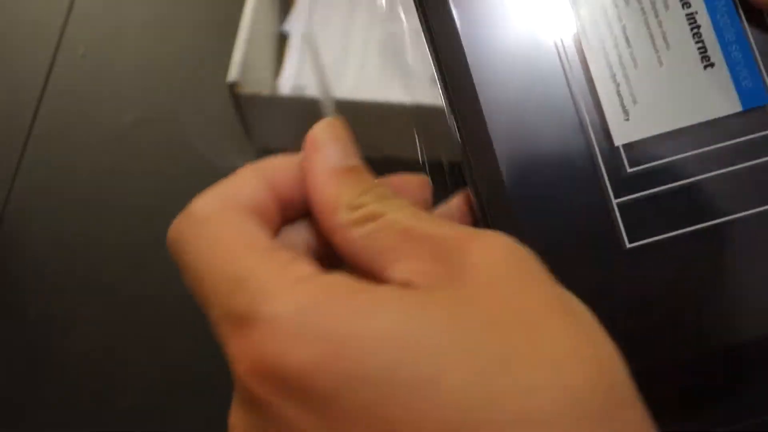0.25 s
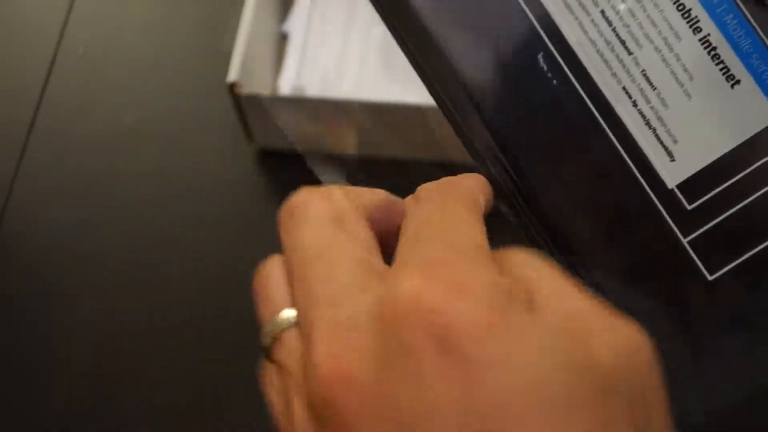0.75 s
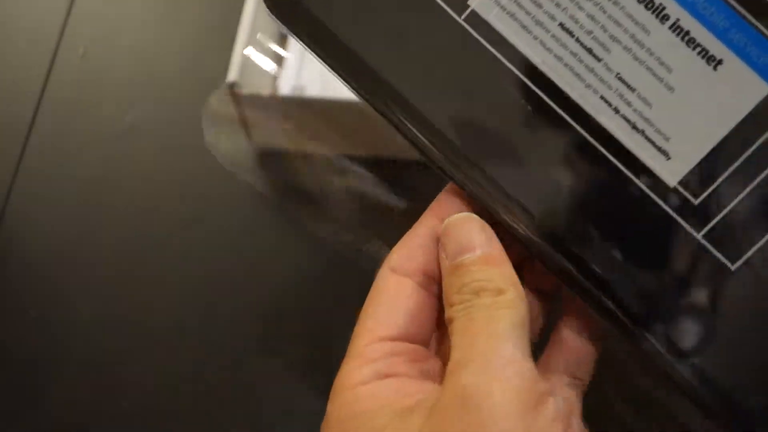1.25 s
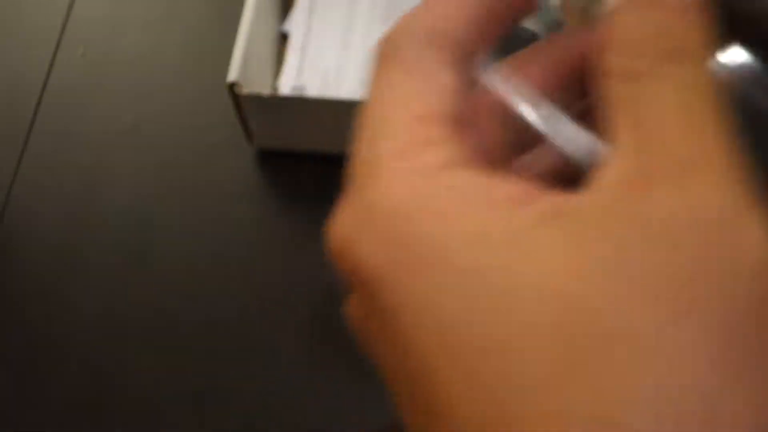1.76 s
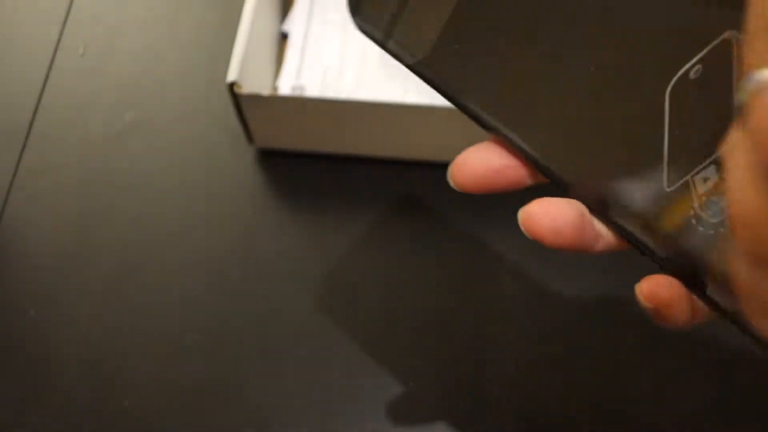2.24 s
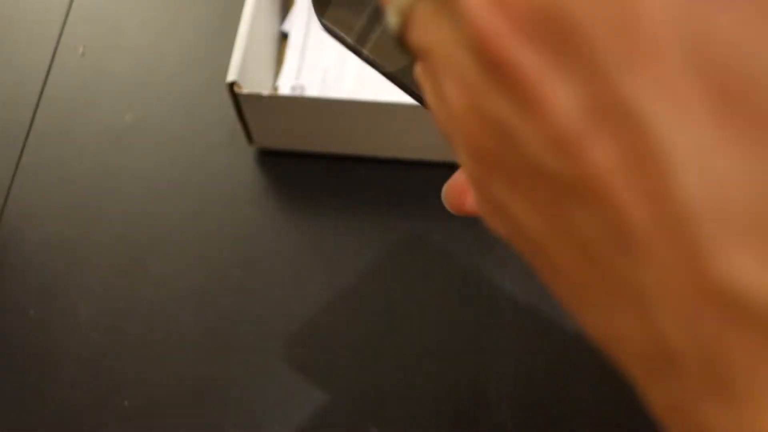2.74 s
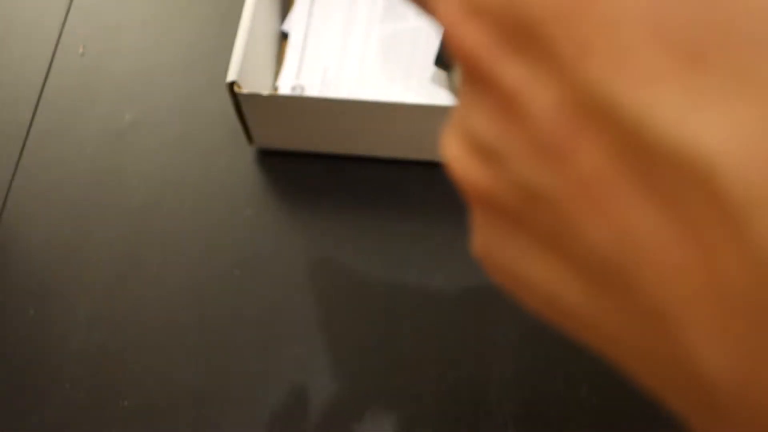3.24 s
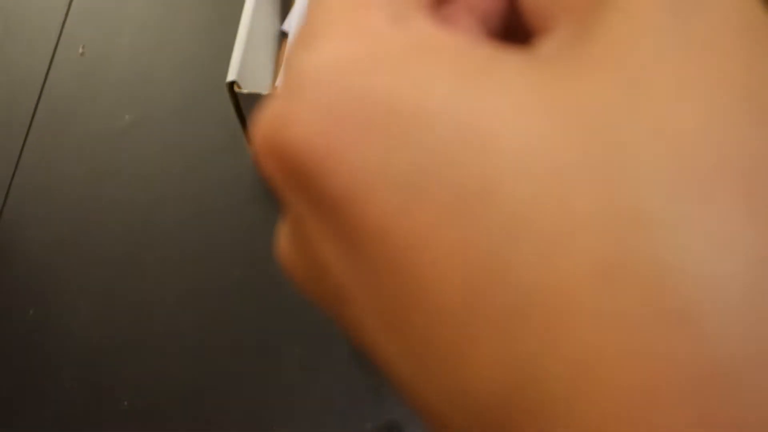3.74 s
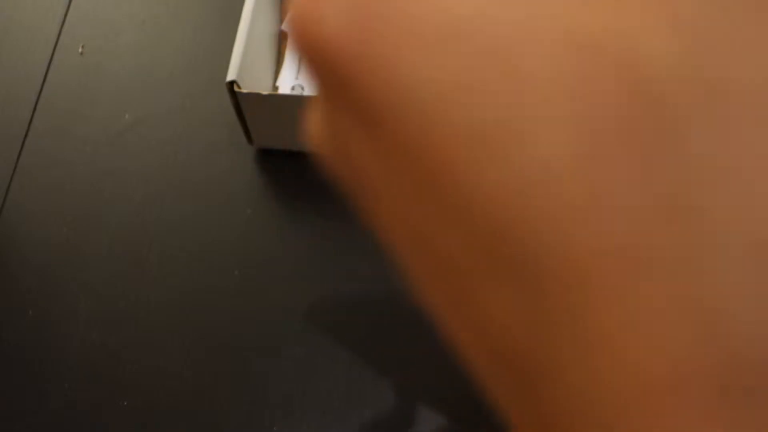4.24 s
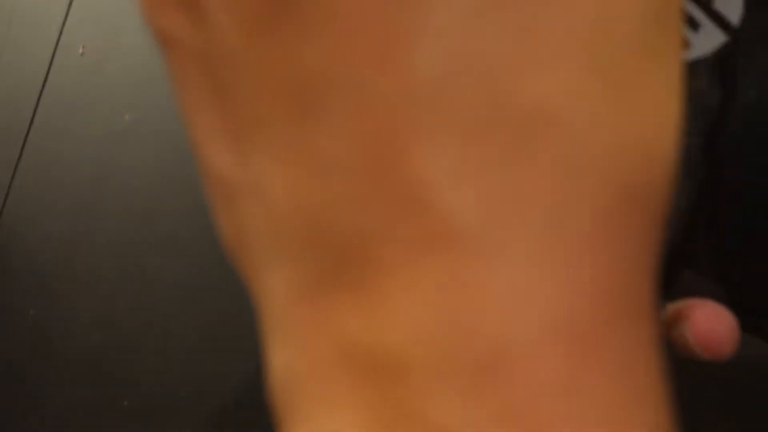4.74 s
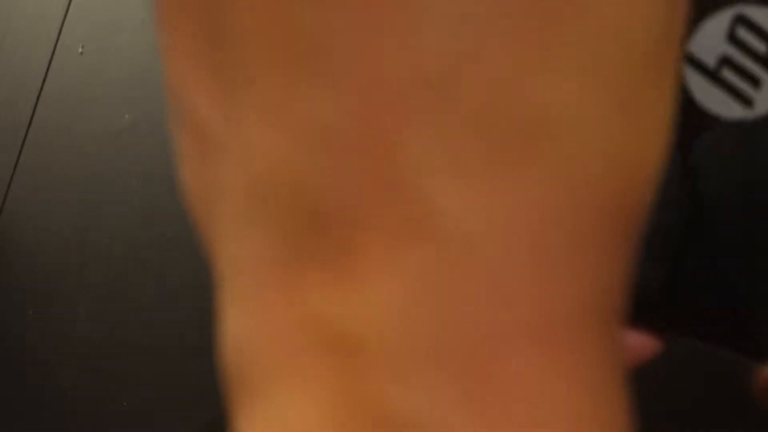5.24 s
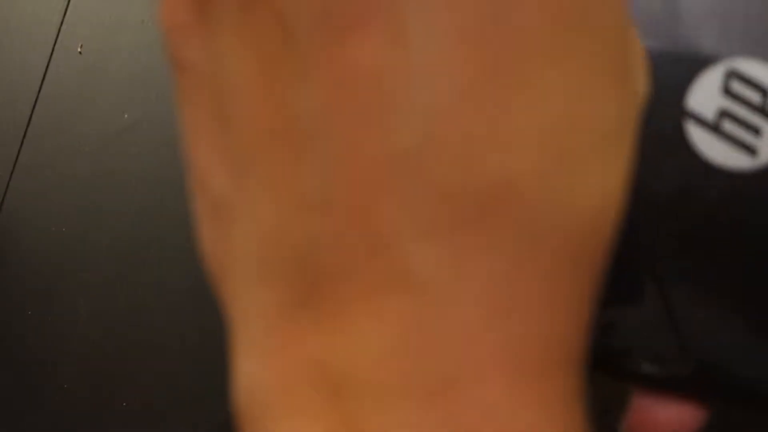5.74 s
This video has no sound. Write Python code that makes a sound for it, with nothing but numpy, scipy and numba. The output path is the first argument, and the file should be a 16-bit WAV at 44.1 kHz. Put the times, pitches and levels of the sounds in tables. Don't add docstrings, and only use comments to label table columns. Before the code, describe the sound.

A close stereo sound of thin, stiff plastic film being pulled off a flat device in a quiet, very dry room. From 0 to 0.3 s it peels in the loudest jerks, bright hard snaps with dense crackle. Until 1.7 s the rustling is softer and uneven, with a low, hollow hum from the slab and soft fingertip taps near 0.4 and 0.65 s. Between 1.7 and 2.35 s the sheet is crushed in the fist in crisp, clumped crumples. A lull of faint hiss follows until 2.8 s. Then come light picking and small crinkles, with a run of tiny, bright glue ticks around 3.9 to 4.2 s. At 4.25 s the second sheet gives a sharp burst; more strong snaps come near 4.8 and 5.03 s, with rustling between. From 5.2 s it thins to quiet, fine crackles. Soft hiss stays underneath.

```python
import sys
import numpy as np
from scipy import signal
from scipy.fft import rfft, irfft, next_fast_len
from scipy.io import wavfile
from scipy.ndimage import uniform_filter1d, map_coordinates
from numba import njit

SR = 44100
rng = np.random.default_rng(int(sys.argv[2]) if len(sys.argv) > 2 else 0)


def wav_out(sig):
    wavfile.write(sys.argv[1], SR, np.round(np.clip(np.atleast_2d(sig).T, -1, 1) * 32767).astype(np.int16))


def invert_db(level):
    return 10 ** (np.asarray(level, dtype=float) / 20)


N = 264159


def unit(x):
    return x / np.sqrt(np.mean(x ** 2) + 1e-20)


def along(points, hz):
    point_hz, value = np.transpose(points)
    return np.interp(np.log(hz + 1), np.log(point_hz + 1), value)


def wobble(rate):
    knots = rng.standard_normal(N // 20)
    return map_coordinates(knots, [np.arange(N) * rate / SR])


def filtered(x, response):
    m = next_fast_len(N + 8192)
    hz = np.fft.rfftfreq(m, 1 / SR)
    return irfft(rfft(x, m) * response(hz), m)[..., :N]


@njit
def add_clicks(out, start, turn, cycles, gain):
    for g in range(len(start)):
        first = max(int(start[g]) + 1, 0)
        last = min(first + int(7 * cycles * 1 / turn[g]), len(out))
        for i in range(first, last):
            u = (i - start[g]) * turn[g]
            fade = np.exp(-u / cycles) * (1 - np.exp(-4 * u))
            out[i] += gain[g] * np.sin(2 * np.pi * u) * fade


def clicks(s, gain, hz, octaves, cycles, aim, lag=0.77, lag_spread=1.56, pan_spread_db=-0.5):
    draw = rng.standard_normal((len(s), 4))
    turn = np.clip(hz * 2 ** (octaves * draw[:, 0]) / SR, .002, .4)
    late = lag + lag_spread * draw[:, 1]
    lean = invert_db(aim * pan_spread_db * draw[:, 2] / 2)
    sign = np.sign(draw[:, 3])
    pair = np.zeros((2, N))
    add_clicks(pair[0], s * SR + late / 2, turn, float(cycles), gain * lean * sign)
    add_clicks(pair[1], s * SR - late / 2, turn, float(cycles), gain / lean * sign)
    return pair


# start_s, level_db (beside the film)
GRIP_POINTS = [(0, -54), (.12, -12), (.56, -3), (.85, -0.5), (1.05, -11), (1.25, 1.5), (1.39, -15.5),
               (1.53, -1.5), (1.59, -9.5), (2.1, -20), (2.8, 0.5), (3.23, -16.5), (3.55, -8.5), (3.9, 0.5),
               (4.3, -22), (4.8, -21), (5.58, -13.5), (5.78, -3)]


def grip_db(s):
    return np.interp(s, *np.transpose(GRIP_POINTS))


# peak_s, level_db, swell_s, fade_s, brightness_db
FRONT_SHEET_PULLS = [(0.0, -39.5, .02, 0.42, 3), (0.083, -31, 0.025, 0.19, 10),
                     (.148, -24.5, 0.015, 0.091, -2.5), (.201, -30, .008, 0.03, 2),
                     (.303, -35, 0.047, 0.038, 1.5), (.376, -41.5, 0.02, 0.043, -8),
                     (0.408, -45, 0.041, 0.27, 6), (0.509, -40.5, 0.036, 0.12, -3),
                     (.583, -48, .012, .15, 7), (0.617, -46, 0.06, 0.015, 5.5),
                     (0.646, -43.5, .012, 0.095, -5), (0.807, -51, 0.055, 0.14, 2.5),
                     (.897, -49.5, .05, 0.071, 1.5), (0.939, -43.5, 0.031, 0.33, -2),
                     (1.045, -40, 0.087, 0.064, -4), (1.081, -39, 0.16, 0.031, -6),
                     (1.148, -56.5, 0.014, 0.29, 7), (1.2, -61, 0.018, 0.022, -3.5),
                     (1.258, -58, 0.024, 0.066, 17), (1.277, -55.5, 0.0088, 0.018, -3),
                     (1.374, -42, 0.043, 0.8, 2), (1.5, -48.5, 0.043, 0.21, 10.5),
                     (1.596, -35, 0.016, 0.031, -4), (1.64, -55, .05, 0.081, -5),
                     (1.68, -46, .015, 0.031, -4.5)]
FIST_SQUEEZES = [(1.705, -50.5, 0.1, 0.045, 14.5), (1.786, -33.5, 0.032, 0.036, 0),
                 (1.848, -37.5, 0.048, 0.27, 4), (1.926, -38.5, 0.0096, 0.099, -3),
                 (1.957, -41.5, .01, .08, 1.5), (1.996, -43, .01, 0.15, -1.5), (2.04, -49, .2, 0.24, 17),
                 (2.082, -34.5, 0.018, 0.079, 2), (2.1, -42, .02, 0.2, 0.5), (2.24, -53, 0.13, .1, -1.5),
                 (2.285, -42.5, 0.066, 0.044, -3.5), (2.334, -44, 0.042, 0.055, -5),
                 (2.4, -68, 0.022, 0.08, -4)]
BACK_SHEET_PICKS = [(2.811, -59.5, 0.013, 0.03, -10), (2.864, -63.5, .01, 0.026, -14),
                    (2.939, -63.5, 0.27, 0.26, -4.5), (2.984, -53, 0.0054, 0.076, 9.5),
                    (3.026, -47.5, 0.0082, 0.24, 4.5), (3.08, -42, 0.061, 0.1, 1.5),
                    (3.135, -49.5, 0.17, 0.036, 6), (3.19, -52.5, 0.017, 0.15, 2.5),
                    (3.238, -42.5, 0.07, 0.015, 9.5), (3.31, -61, .006, 0.027, 2),
                    (3.36, -58, 0.02, 0.081, 3), (3.442, -48, .003, .025, 7), (3.458, -45, 0.004, 0.06, 13),
                    (3.488, -49.5, 0.0043, .03, 3), (3.51, -43, 0.033, 0.14, 4.5),
                    (3.59, -42, 0.15, 0.05, 7), (3.63, -64, .1, 0.2, -4), (3.751, -61.5, 0.21, 0.24, -1.5),
                    (3.927, -56, 0.028, 0.053, 0), (4.05, -63, 0.23, 0.41, 6),
                    (4.165, -58.5, 0.19, .04, -2.5)]
BACK_SHEET_PULLS = [(4.21, -54.5, 0.0083, 0.024, -17), (4.254, -35, 0.025, 0.088, 7.5),
                    (4.3, -28, 0.06, 0.068, 3), (4.369, -50.5, 0.13, 0.16, -1),
                    (4.508, -53.5, 0.011, .1, 2.5), (4.536, -57.5, 0.0071, .05, -0.5),
                    (4.558, -36.5, 0.016, 0.075, 7.5), (4.619, -44.5, 0.022, 0.1, 4.5),
                    (4.685, -57.5, .01, .1, 0), (4.748, -52.5, 0.034, .1, 0), (4.827, -35.5, 0.11, 0.14, 2),
                    (5.04, -42.5, 0.096, 0.16, 2), (5.065, -42, 0.028, .04, 8), (5.16, -55, .1, .1, 4.5),
                    (5.226, -52, 0.01, 0.06, 6), (5.279, -56, .012, .04, 11),
                    (5.315, -60, 0.025, .04, 10.5), (5.393, -55, 0.012, 0.12, 11),
                    (5.443, -56, 0.013, .1, 5), (5.535, -49.5, 0.0073, 0.04, 7.5),
                    (5.548, -51.5, .01, .07, 7), (5.607, -47, .025, 0.03, 6), (5.63, -52, .03, 0.17, 6),
                    (5.72, -57, 0.12, 0.15, -2), (5.87, -57, 0.13, .25, 2.5), (5.98, -56.5, 0.06, 0.2, 6)]
SPAN_DB = 20
FOLD_DB, FIZZ_DB = -2.5, -3
FOLD_FOLLOWS, FIZZ_FOLLOWS = 1.16, 0.93
SLAB_FOLLOWS = 0.13


def effort():
    t = np.arange(N // 32 + 2) * 32 / SR
    pulls = FRONT_SHEET_PULLS + FIST_SQUEEZES + BACK_SHEET_PICKS + BACK_SHEET_PULLS
    s, level_db, swell, fade, bright = np.transpose(pulls)[..., None]
    rising = (s - t) / np.maximum(swell, .003)
    falling = (t - s) / np.maximum(fade, .003)
    pull_db = level_db - SPAN_DB * np.maximum(rising, falling)
    slab_db = grip_db(t) - SLAB_FOLLOWS * bright
    fold_db = FOLD_DB - FOLD_FOLLOWS * bright
    fizz_db = FIZZ_DB + FIZZ_FOLLOWS * bright
    curves = []
    for db in (slab_db, fold_db, 0, fizz_db):
        total = np.linalg.norm(invert_db(pull_db + db), axis=0)
        curves.append(np.interp(np.arange(N) / SR, t, total))
    return curves


# pitch_hz, pitch_spread_octaves, life_cycles, sliding_clicks_per_s, clump_length_s,
# snap_level_db, how_directional (0-1)
RINGING_PARTS = [
    (416, 0.27, 1.7, 710, .004, -2, 0.06),
    (1400, 0.46, 1.1, 2500, 0.001944, -4, 0.1),
    (4310, 0.45, 1.49, 5000, 0.001232, 0, 1),
    (10030, 0.4, 1.85, 9300, 0.00072, 3, 0.2),
]
# start_s, then pitch shifts of big_folds_octaves,
# small_folds_octaves, fizz_octaves
STRETCH_POINTS = [(0, 0, -.1, 0), (.6, -.2, 0, 0), (.95, -.35, -0.0084, -0.041), (1.3, -.3, -.05, 0),
                  (1.45, -.2, 0, .15), (1.7, -.3, -.1, 0.18), (1.95, -.2, 0.06, .15), (2.15, 0.11, .3, .2),
                  (2.5, -0.095, 0, 0), (3.0, .8, .2, 0.04), (3.6, 0.71, -.1, 0.077), (4.0, 0.24, 0, 0),
                  (4.3, .2, 0, -0.064), (4.6, .6, -0.035, 0), (5.0, 0.53, 0, -0.17), (5.3, 0.57, .4, -.3),
                  (5.65, 0.41, .4, -.2), (5.99, 0.24, -0.36, -.2)]


def slide():
    clumps_db = 1.1 * wobble(30) + 1.3 * wobble(150)
    out = np.zeros((2, N))
    when, *shifts = np.transpose(STRETCH_POINTS)
    shifts = [0 * when] + shifts
    for part, gain, shift in zip(RINGING_PARTS, effort(), shifts):
        hz, octaves, cycles, rate, _, _, aim = part
        draw = rng.random((60000, 2))[:int(rate * N / SR)]
        s = draw[:, 0] * N / SR
        strength = invert_db(-1.8 * np.log(draw[:, 1]))
        pitch = hz * 2 ** np.interp(s, when, shift)
        stream = clicks(s, strength, pitch, octaves, cycles, aim)
        out += unit(stream * invert_db(clumps_db + 2.36 * wobble(25))) * gain
    return out


# start_s, peak_db, big_fold_db, fizz_db, big_fold_pitch_hz
FRONT_SHEET_CREASES = [(0.0799, -7.5, -25, -8, 2900), (0.1458, -5, -4.5, -19, 2310),
                       (0.1521, -9.5, 4, -10, 1025), (0.1572, -7.5, -16, -5, 1000),
                       (0.201, -7, -13, -0.5, 2630), (0.277, -37.5, 10, -9.5, 1040),
                       (0.2929, -17, 7, -0.5, 2150), (0.3673, -18, 9.5, -13, 2210),
                       (.369, -30, 14.5, -20.5, 1100), (0.384, -22, -0.5, -29.5, 2070),
                       (0.4376, -24, 0, 5.5, 2100), (0.4969, -20.5, -18, 3.5, 2310),
                       (.512, -26, -0.5, 7, 1080), (0.528, -31.5, 8.5, -16.5, 2800),
                       (0.6515, -19.5, 9, -4.5, 1060), (0.698, -22.5, -1, -5.5, 1180),
                       (1.0467, -26, 12, -17.5, 1100), (1.0636, -34.5, 6, -17, 1510),
                       (1.4714, -28, -3, -6, 2210), (1.481, -31, 2, -13, 1940),
                       (1.5942, -21, 0.5, -10.5, 2033)]
FIST_CREASES = [(1.771, -18.5, -13, -6, 2666), (1.7788, -10, -11, -6, 3450), (1.7972, -26, -5, 7, 2300),
                (1.8375, -20, 2, 15, 1370), (1.877, -17, 3.5, -9.5, 2590), (1.9252, -17.5, 6, -15, 866),
                (1.9549, -22, 3, -9.5, 1380), (1.974, -33, 8.5, -9.5, 1370), (1.9943, -27, 7, 4.5, 1310),
                (2.0807, -19, 6.5, 10.5, 1415), (2.0947, -32.5, 9, 13.5, 1497), (2.2648, -40, 15, -6, 1400),
                (2.282, -19.5, -17, -15.5, 2540), (2.2908, -23.5, 1.5, -25.5, 2500),
                (2.33, -24.5, 4.5, -15, 2900), (2.4078, -39.5, 10.5, -18, 1420)]
BACK_SHEET_CREASES = [(2.809, -35, -13, -35, 1440), (2.864, -35, 7, -10, 836), (2.9994, -48, 6, -5, 1270),
                      (3.079, -28.5, 5.5, -22, 2860), (3.086, -28.5, 4.5, -15, 2900),
                      (3.4412, -42, 2, 6.5, 2670), (3.4943, -33, 8, 1.5, 1950),
                      (3.553, -24.5, 4.5, -9, 2720), (3.7455, -37, 4.5, -3, 2820),
                      (4.2015, -38, -3, 2, 1660), (4.2115, -33, 13, -1.5, 2200),
                      (4.25, -24.5, 13, -10, 1400), (4.259, -9, -5, -25.5, 1900),
                      (4.279, -10.5, -4, 2, 1920), (4.3132, -17, -5, -7, 1630), (4.412, -38, -3, -27, 2200),
                      (4.7858, -27.5, 6, 4.5, 2190), (4.7937, -8.5, -2.5, -36, 1780),
                      (4.8265, -9, -1, -2, 2050), (5.0306, -12, -13, 0.5, 2470),
                      (5.1019, -19.5, -2, -22, 2590), (5.6077, -41, -10, 9, 2360),
                      (5.6976, -34, 1, -20.5, 1460)]
# start_s, peak_db, fizz_db
WRINKLE_TICKS = [(.033, -28, 2.5), (.0747, -21.5, -12), (0.3068, -20, -4), (.504, -24, 2.5),
                 (1.789, -26, 2), (1.847, -34, 13.5), (3.446, -36, -5), (3.469, -46, 19.5),
                 (3.761, -33.5, -3), (3.928, -32.5, -5), (3.947, -41.5, 5), (3.998, -53, 10),
                 (4.0264, -55, 18), (4.0325, -54, 12), (4.0476, -46, 12), (4.0533, -42, 12),
                 (4.095, -51, 10.5), (4.1018, -46.5, 10.5), (4.1137, -38, 4), (4.1216, -41, -3),
                 (4.151, -44, 7), (4.1556, -41, 8), (4.163, -37, 3), (4.559, -24, -4),
                 (4.992, -25.5, -13.5), (4.9964, -34, 5), (5.042, -25, 3), (2.981, -40, -1.5),
                 (.8046, -42, 1.5), (.8974, -37, -11.5), (.9413, -36, -5), (1.0336, -30, -9.5),
                 (1.0785, -29, -8.5), (1.371, -40.5, 8), (1.6782, -39, -4), (3.0182, -44, -4),
                 (3.2297, -44, 8), (3.3085, -58, 0), (3.3619, -48, 0), (3.6901, -41.5, -6.5),
                 (4.292, -21, -1), (4.6181, -27.5, -3), (4.7443, -31, -5.5), (5.0132, -28, -7),
                 (5.0631, -36.5, 8.5), (5.2292, -43.5, 0), (5.413, -53, -5), (5.4397, -50, 5),
                 (5.5435, -46.5, 3), (2.272, -34, 3.5), (1.845, -30, 4), (.1165, -30, -8)]
# start_s, peak_db, fizz_db
MORE_TICKS = [(0.0104, -20, 7), (0.1451, -5, 7), (0.1584, -7, 7), (0.1624, -16, 7), (0.5574, -30, 7),
              (0.6164, -28, 7), (3.9125, -34, 7), (3.9314, -33, 7), (3.9504, -40, 7), (3.9544, -44, 7),
              (3.9634, -45, 7), (3.9734, -45, 7), (3.9809, -37, 7), (4.0044, -44, 7), (4.0164, -30, 7),
              (4.0584, -33, 7), (4.0801, -32, 7), (4.1174, -37, 7), (4.1324, -39, 7), (4.142, -29, 7),
              (4.1584, -29, 7), (4.1704, -41, 7), (4.1999, -30, 7), (4.2054, -30, 7), (5.7954, -47, 7)]
MORE_TICKS_DB = -9
TICK_FOLD_DB, TICK_HZ = -15.5, 2500
SNAP_SLAB_DB, SNAP_SLAB_FOLLOWS = -10.5, 0.91
CRACK_DB, CRACK_HZ, CRACK_CYCLES = -5, 7000, 0.35


def snaps(count=10):
    ticks = [(s, db, TICK_FOLD_DB, fizz, TICK_HZ) for s, db, fizz in WRINKLE_TICKS]
    ticks += [(s, db + MORE_TICKS_DB, TICK_FOLD_DB, fizz, TICK_HZ) for s, db, fizz in MORE_TICKS]
    creases = FRONT_SHEET_CREASES + FIST_CREASES + BACK_SHEET_CREASES + ticks
    s, peak_db, big, fizz, fold_hz = np.transpose(creases)
    slab = SNAP_SLAB_DB + SNAP_SLAB_FOLLOWS * big + grip_db(s)
    out = np.zeros((2, N))
    for part, rel_db in zip(RINGING_PARTS, (slab, big, 0 * s, fizz)):
        hz, octaves, cycles, _, clump, part_db, aim = part
        if rel_db is big:
            hz, octaves, cycles = np.repeat(fold_hz, count), .3, 1.4
        draw = rng.random((300, count, 2))[:len(s)]
        after = -np.log(draw[..., 0]) * (np.arange(count) > 2) + 0.098 * draw[..., 0]
        fall_db = -5 * after - 7 * draw[..., 1] * (np.arange(count) > 0)
        gain = invert_db((peak_db + rel_db + part_db)[:, None] + fall_db)
        start = s[:, None] + clump * after
        out += clicks(start.ravel(), gain.ravel(), hz, octaves, cycles, aim, lag_spread=1.0)
    crack = invert_db(peak_db + CRACK_DB) * (0.17 + 0.8 * invert_db(fizz))
    return out + clicks(s, crack, CRACK_HZ, 0.17, CRACK_CYCLES, .5, lag_spread=.3)


def patchy(pair, depth_db):
    z = signal.stft(pair, nperseg=512)[2]
    field = rng.standard_normal(z.shape[1:])
    field = uniform_filter1d(field, size=22, axis=0)
    field = uniform_filter1d(field, size=9, axis=1)
    return signal.istft(z * invert_db(depth_db * unit(field)), nperseg=512)[1][:, :N]


# start_s, left_minus_right_db, extra_path_off_the_table_ms
HAND_PLACES = [(0, -1, 0.86), (.3, 1, 0.87), (1.7, 0.5, 0.81), (2.2, -1.5, 0.74), (2.601, -1.5, 0.67),
               (3.5, -1, 0.75), (4.3, 0, .66), (4.8, -1.5, 0.64), (5.5, -2.5, 0.8), (5.99, -2.5, 0.84)]


def placed(pair, bounce=0.19, dull_hz=3500):
    s, lean_db, ms = np.transpose(HAND_PLACES)
    now = np.arange(N)
    source = now - np.interp(now / SR, s, ms) * SR / 1000
    dull = filtered(pair, lambda hz: 1 / (1 + (hz / dull_hz) ** 2))
    copy = np.array([np.interp(source, now, side) for side in dull])
    balance_db = np.outer([.5, -.5], np.interp(now / SR, s, lean_db))
    return (pair + bounce * copy) * invert_db(balance_db)


# start_s, peak_db, pitch_hz
FINGER_TAPS = [(0.113, -34, 380), (0.365, -28.5, 440), (0.654, -31, 450), (2.004, -40, 433),
               (2.324, -50, 290), (2.405, -44, 272), (2.863, -48, 410), (3.087, -50, 377),
               (3.492, -37, 383), (3.55, -43, 436), (3.725, -39, 320), (3.782, -44, 361), (3.902, -50, 296),
               (3.925, -52, 358), (4.101, -53, 361), (4.621, -46, 293), (5.028, -37, 398),
               (5.1, -37.5, 409), (5.713, -41, 393), (5.794, -53.5, 420)]


def taps(count=3):
    s, peak_db, hz = np.repeat(FINGER_TAPS, count, axis=0).T
    start = s + 0.004 * rng.random(len(s))
    return clicks(start, invert_db(peak_db - 3.5), hz, octaves=0.19, cycles=1.9, aim=.1)


# pitch_hz, width_hz, level_db
HOLLOWS = [(313, 14, -4.5), (398, 77, -1.5), (450, 55, -4), (930, 130, -5), (2127, 58, -6.5),
           (4100, 250, -13)]
# pitch_hz, level_db
FILM_COLOUR = [(60, -34.5), (150, -9), (300, -4), (640, -6), (1000, -1.5), (1720, -0.5), (2500, 2),
               (6000, 2.5), (13000, 5), (15300, -0.5), (16000, -8), (17000, -28)]
# pitch_hz, left_minus_right_db
FILM_LEAN = [(200, -0.5), (600, 0), (1500, -4), (5000, -2.5), (12000, -1)]


def coloured(pair):
    def colour(hz):
        hollow = 1
        for c, width, db in HOLLOWS:
            hollow = hollow + invert_db(db) * 1j * hz * width / (c * c - hz * hz + 1j * hz * width)
        lean_db = np.outer([.5, -.5], along(FILM_LEAN, hz))
        return hollow * invert_db(along(FILM_COLOUR, hz) + lean_db)
    return filtered(pair, colour)


# pitch_hz, likeness (0-1)
LIKENESS = [(60, 0.88), (240, 0.99), (950, 0.11), (3770, 0.06), (15000, 0.04)]


def ports(pair, spectrum):
    def shape(hz):
        turn = np.arccos(np.clip(along(LIKENESS, hz), -1, 1)) / 2
        return invert_db(along(spectrum, hz)) * [np.cos(turn), np.sin(turn)]
    mid, side = filtered(pair, shape)
    return unit(np.array([mid + side, mid - side]))


# pitch_hz, time_to_fall_60_db_s
ROOM_DECAY = [(200, 0.035), (1500, 0.035), (10000, 0.033)]


def room(x):
    length = SR // 3
    hz, t, z = signal.stft(rng.standard_normal((2, length)), SR, nperseg=256)
    fade = invert_db(-60 * t / along(ROOM_DECAY, hz)[:, None])
    noise = signal.istft(z * fade, SR, nperseg=256)[1]
    tail = ports(noise, [(100, 0)])[:, :length]
    tail = tail / np.linalg.norm(tail[0])
    late = np.pad(x.mean(0), (130, 0))[None]
    return signal.fftconvolve(late, tail, axes=1)[:, :N]


# pitch_hz, level_db (per Hz)
HISS_COLOUR = [(15, -53), (25, -26), (124, -21), (245, -9), (538, -12), (669, -9.5), (726, -9.5),
               (1930, -14.5), (2400, -9), (3410, -19.5), (4200, -12), (4900, -19), (11600, -25.5),
               (15200, -28), (16500, -30.5)]
HISS_DB = -68.5


def hiss():
    return invert_db(HISS_DB + 3.5) * ports(rng.standard_normal((2, N)), HISS_COLOUR)


def scene():
    sliding = invert_db(-2.0) * patchy(slide(), depth_db=2.0)
    creasing = invert_db(-0.83) * snaps()
    film = coloured(placed(sliding + creasing) + taps())
    return film + invert_db(-14) * room(film) + hiss()


def top_cut(x):
    return signal.sosfilt(signal.butter(12, 15880, fs=SR, output="sos"), x)


def record(dry):
    soft = dry / (1 + np.abs(dry / .95) ** 4) ** (1 / 4)
    return top_cut(soft)


dry = scene()
out = record(dry)
wav_out(out)
```